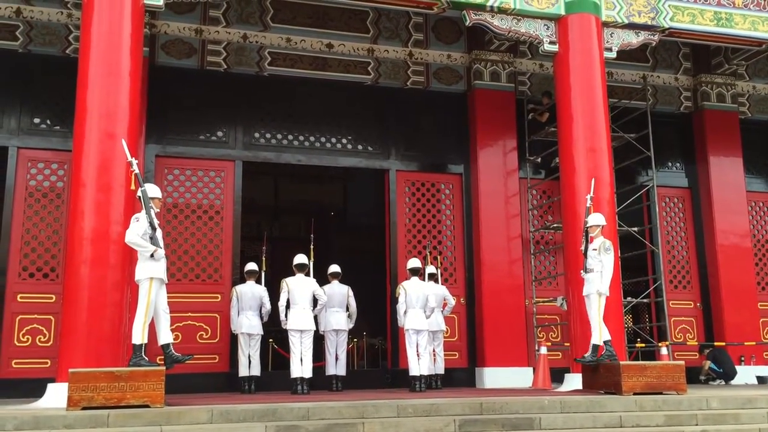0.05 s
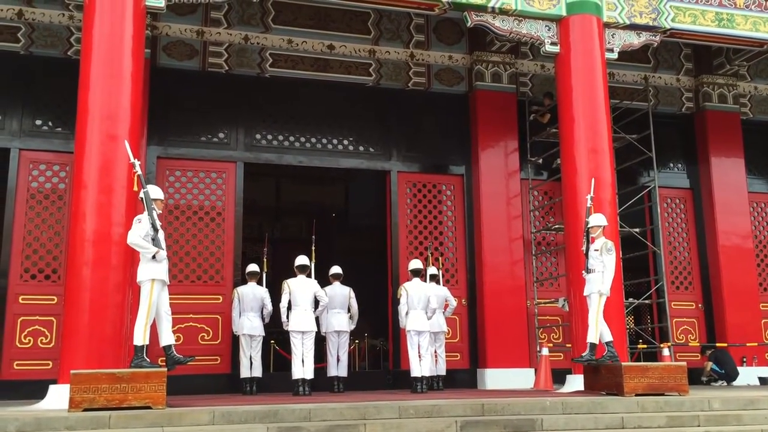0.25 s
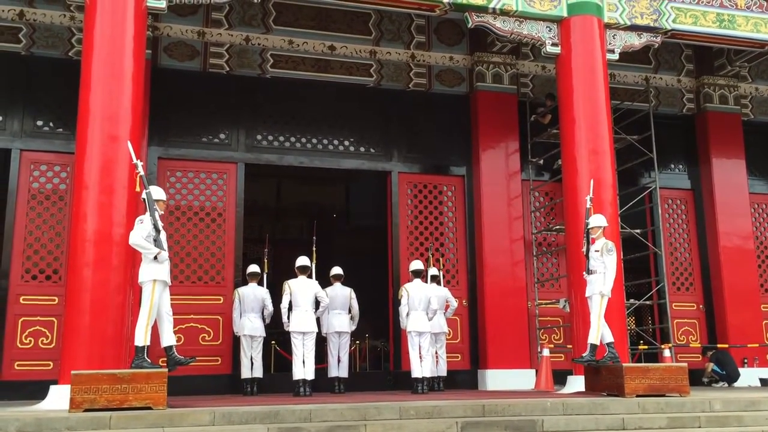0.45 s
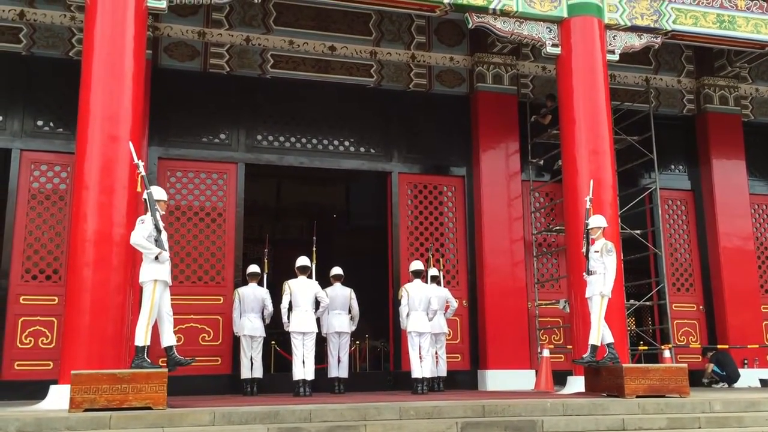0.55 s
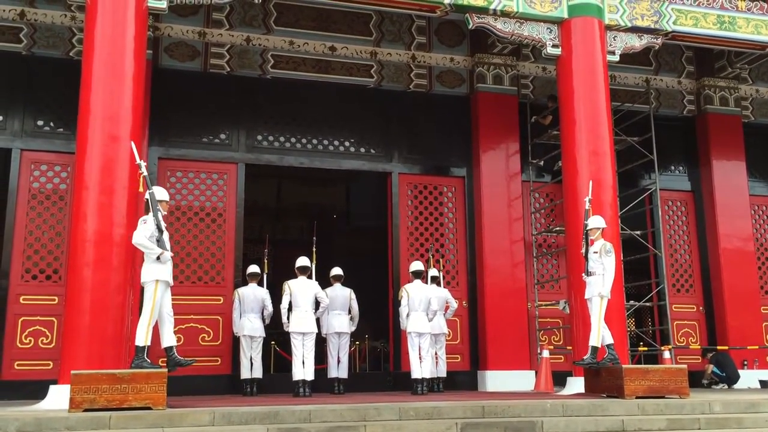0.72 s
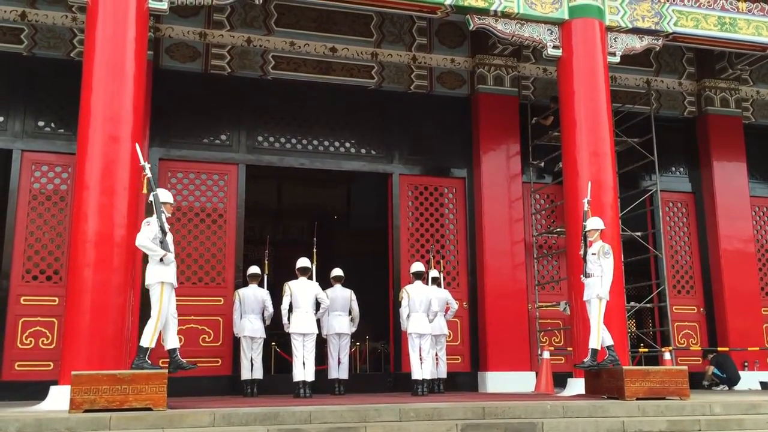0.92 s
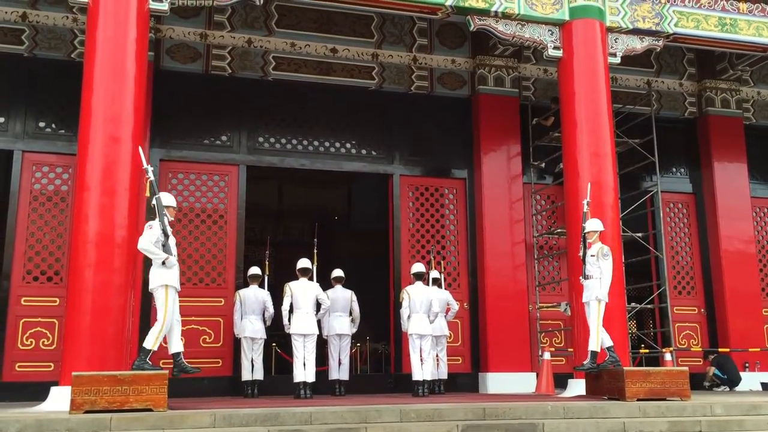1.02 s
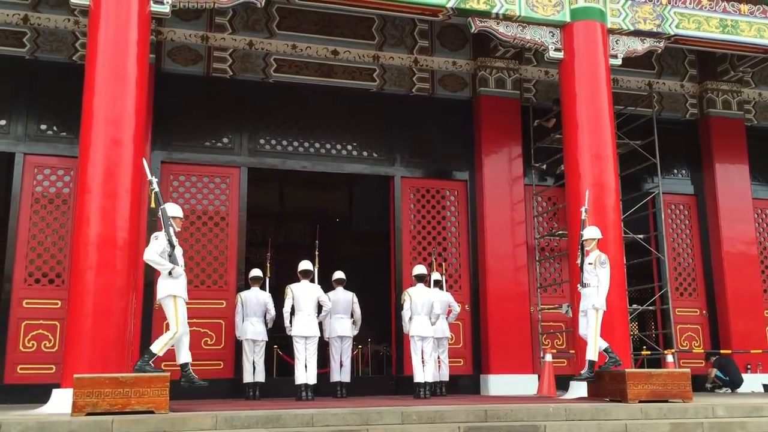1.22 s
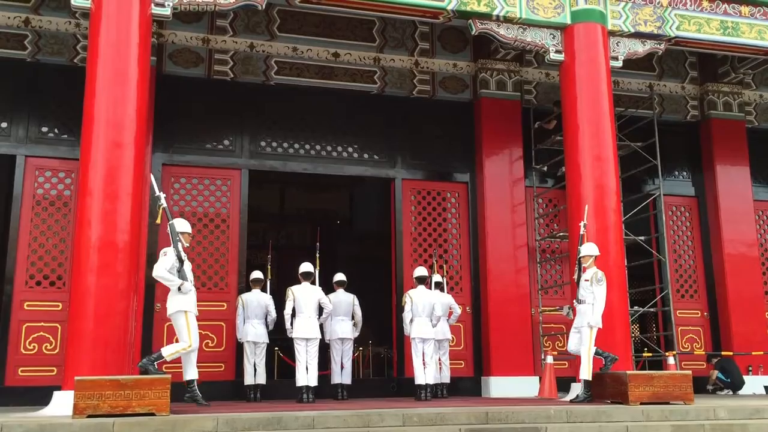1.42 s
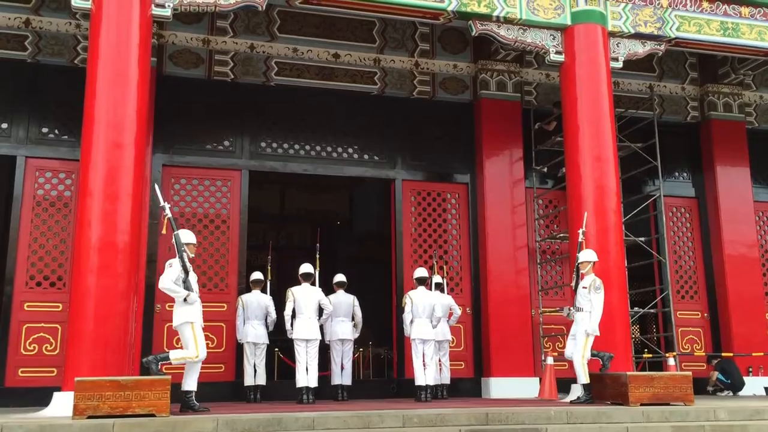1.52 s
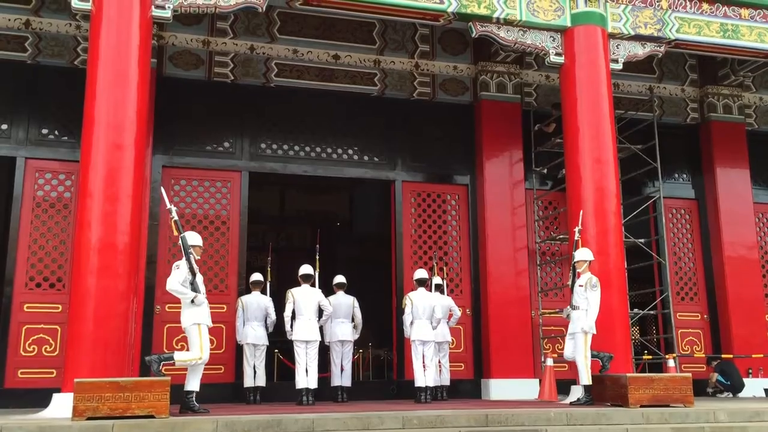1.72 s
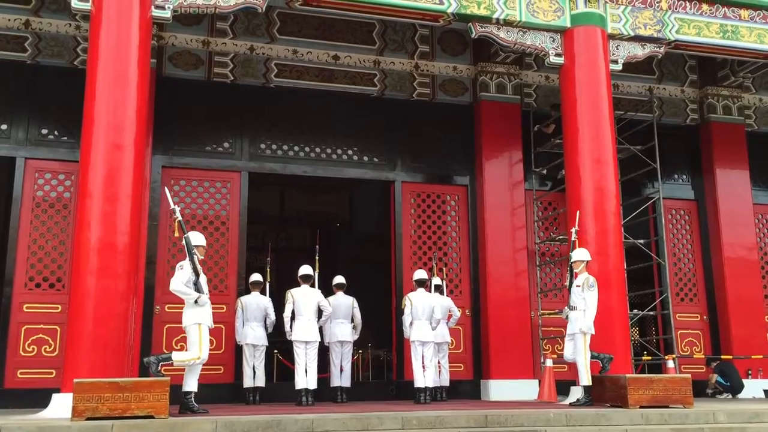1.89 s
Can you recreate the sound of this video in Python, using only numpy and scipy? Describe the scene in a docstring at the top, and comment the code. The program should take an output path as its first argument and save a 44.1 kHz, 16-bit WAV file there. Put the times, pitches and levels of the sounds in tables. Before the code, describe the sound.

One loud, sharp boot stamp on a wooden stand rings out in the porch of a large hall. As the echo fades there are tiny nearby ticks, then light metal clinks and gentle steps, with a town rumbling faintly far away.

```python
"""A distant town rumbles faintly; then a sharp crack as a guard stamps a steel-shod boot on a hollow
wooden stand in the porch of a large hall. Heel and sole ring the stand, the porch roof throws the
crack back and the hall rings on, with a few small dry ticks near by. Then the guards step down:
cloth rustles, a sole scuffs, rifle fittings clink and boots thud."""
import sys
import numpy as np
from scipy import signal
from scipy.fft import rfft, irfft
from scipy.io import wavfile

SR = 44100
rng = np.random.default_rng(int(sys.argv[2]) if len(sys.argv) > 2 else 0)


def dump(signal):
    """Clip the signal to [-1, 1] and save it as 16-bit WAV at the path in sys.argv[1]."""
    limited = np.clip(np.atleast_2d(signal).T, -1, 1)
    pcm = np.round(limited * 32767).astype(np.int16)
    wavfile.write(sys.argv[1], SR, pcm)


N = 85995


def undb(db):
    return 10 ** (np.asarray(db) / 20)


def clock():
    return np.arange(N) / SR


def fade(t60_s):
    return np.exp(-np.log(1000) * clock() / t60_s)


def by_pitch(hz, points, column=1):
    """Table column interpolated over log frequency."""
    points = np.array(points, float)
    return np.interp(np.log(np.maximum(hz, 1)), np.log(points[:, 0]), points[:, column])


def bin_gains(colour):
    return undb(by_pitch(np.fft.rfftfreq(N, 1 / SR), colour))


def noise(colour):
    """Coloured noise, rms 1."""
    x = irfft(rfft(rng.standard_normal(N)) * bin_gains(colour), N)
    return x / x.std()


def click(colour):
    """Coloured minimum-phase pulse."""
    cepstrum = irfft(np.log(bin_gains(colour)), N)
    causal_fold = 1 + np.sign(np.fft.fftfreq(N))
    return irfft(np.exp(rfft(cepstrum * causal_fold)), N)


def wander(rate_hz):
    """Random drift, spread near 1."""
    knots = rng.standard_normal(1024)
    return np.interp(clock() * rate_hz, np.arange(len(knots)), knots)


def ring(modes):
    """Damped sines of a struck object."""
    return sum(undb(db) * np.sin(2 * np.pi * hz * clock()) * fade(t60_s) for hz, db, t60_s in modes)


def at(start_s, x):
    return np.concatenate([np.zeros(int(start_s * SR)), x])[:N]


def high_pass(x, hz):
    return signal.sosfilt(signal.butter(2, hz, "high", fs=SR, output="sos"), x)


def bloom(delay_s, build_s, t60_s):
    """Unit-energy envelope of reflections: delay, build-up, decay."""
    envelope = np.clip((clock() - delay_s) / build_s, 0, 1) * fade(t60_s)
    return envelope / np.sqrt(np.sum(envelope ** 2))


# town spectrum: f/Hz, level/dB
TOWN_COLOUR = [(20, -14.5), (40, -10.5), (68, 3), (90, -1.5), (150, -6), (240, -8.5), (450, -16.5),
               (750, -19), (1300, -29), (2500, -37), (5000, -45), (10000, -50.5), (16000, -55)]


def town(level_db=-50.5, swell_db=0.9):
    """Far traffic rumbles, gently swelling."""
    return noise(TOWN_COLOUR) * undb(level_db + swell_db * wander(rate_hz=8.04))


# heel and sole contacts: t/s, push level/dB, crack level/dB
STAMP_CONTACTS = [(.2352, -2, -5.5), (.2378, 0, -19)]
# stand modes: f/Hz, level/dB, t60/s
STAND_MODES = [(125, -20.5, .08), (274.7, -18.5, 0.12), (341, -13, 0.037), (563, -17.5, 0.039),
               (709.5, -7, 0.038), (942, -23.5, 0.18), (1019.5, -6.5, 0.034), (1210, -17, 0.0093),
               (1315, -6, 0.008), (1640, -23, 0.012), (2070, -12, 0.023), (3070, -31, 0.011),
               (3940, -23, 0.01)]
# steel plate crack spectrum: f/Hz, level/dB
CRACK_COLOUR = [(150, -33.5), (600, -12.5), (1500, 22), (2500, 7), (4500, -3.5), (5800, 2), (8000, -22),
                (10500, -49), (13000, -39), (16000, -60)]
# spectrum of the slap into the porch: f/Hz, level/dB
SLAP_COLOUR = [(60, -15.5), (130, -3.5), (330, -3), (470, -4), (600, 5), (900, 6.5), (1100, 7), (1260, -1),
               (1420, 3.5), (1750, 2.5), (2120, 3), (2500, -5), (3000, -7.5), (3600, -16), (4700, -23),
               (6000, -24), (8000, -30), (11000, -37), (16000, -43)]


def stamp(stand_db=-0.5, push_s=0.00036, plate_db=-5, crack_t60_s=0.029,
          stand_send_db=-12.5, slap_send_db=26.5):
    """Each contact rings the hollow stand and cracks on the steel plate. Returns direct, room send."""
    struck = ring(STAND_MODES) * np.minimum(clock() / push_s, 1)
    stand = undb(stand_db) * high_pass(struck, hz=380)  # a small box radiates little bass
    pulse = click(SLAP_COLOUR)
    wood = crack = slap = 0
    for t, push_db, crack_db in STAMP_CONTACTS:
        wood += at(t, undb(push_db) * stand)
        crack += at(t, undb(plate_db + crack_db) * noise(CRACK_COLOUR) * fade(crack_t60_s))
        slap += at(t, undb(crack_db) * pulse)
    return wood + crack, undb(stand_send_db) * wood + undb(slap_send_db) * slap


# hall tail: f/Hz, level/dB, t60/s
HALL_TAIL = [(100, -7.5, 1.5), (292.5, 1, 2.04), (630, -1, 1.9), (1030, -3, 2.36), (1970, -3.5, 1.81),
             (2980, -0.5, 1.65), (5270, -1, 1.22), (9050, -8, 0.68), (15000, -2.5, .55)]


def room_response(near_db=-4.5, porch_db=-1, hall_db=-7):
    """Near scatter off floor and pillars, a burst off the porch roof, then the hall; treble dies first."""
    near = rng.standard_normal(N) * bloom(delay_s=.002, build_s=.003, t60_s=.22)
    porch = rng.standard_normal(N) * bloom(delay_s=.022, build_s=.02, t60_s=.38)
    hz = np.fft.rfftfreq(N, 1 / SR)
    white_spectrum = rfft(rng.standard_normal(N))
    edges_hz = np.geomspace(50, 17000, 25)
    hall = 0
    for low_hz, high_hz in zip(edges_hz, edges_hz[1:]):
        centre_hz = np.sqrt(low_hz * high_hz)
        band = irfft(white_spectrum * ((hz >= low_hz) & (hz < high_hz)), N)
        envelope = bloom(delay_s=.065, build_s=0.2, t60_s=by_pitch(centre_hz, HALL_TAIL, column=2))
        hall += band * envelope * undb(by_pitch(centre_hz, HALL_TAIL))
    return undb(near_db) * near + undb(porch_db) * porch + undb(hall_db) * hall


# dry ticks: t/s, level/dB, f/Hz
TICK_HITS = [(0.258, -33.5, 12500), (0.6702, -25.5, 3200), (0.8217, -41.5, 3000), (1.0097, -44, 2370),
             (1.1105, -43.5, 2660)]
# snap spectrum: f/Hz, level/dB
SNAP_COLOUR = [(1500, -9.5), (3000, 6), (6000, 5), (10000, -10.5), (16000, -10)]


def ticks(t60_s=0.0039, snap_db=-18.5):
    """Tiny hard contacts: a brief ring and a snap."""
    track = 0
    for t, db, hz in TICK_HITS:
        snap = undb(snap_db) * noise(SNAP_COLOUR) * fade(t60_s)
        track += at(t, undb(db) * (ring([(hz, 0, t60_s)]) + snap))
    return track


# rustle envelope: t/s, level/dB
RUSTLE_ENVELOPE = [(1.51, -81.5), (1.55, -79), (1.59, -69.5), (1.63, -68), (1.68, -67.5), (1.74, -64),
                   (1.8, -64.5), (1.851, -76), (1.95, -81)]
# spectrum of cloth and clink noise: f/Hz, level/dB
HISS_COLOUR = [(800, -31), (2200, 3.5), (4000, -3), (5200, -7.5), (8500, -7), (11000, -13), (16000, -12)]


def rustle(rough_db=2):
    """Uniform cloth rubs unevenly as the legs swing."""
    times_s, levels_db = np.array(RUSTLE_ENVELOPE).T
    envelope_db = np.interp(clock(), times_s, levels_db)
    cloth = noise(HISS_COLOUR) * (clock() > times_s[0])
    return cloth * undb(envelope_db - rough_db * wander(rate_hz=120))


# scuff spectrum: f/Hz, level/dB
SOLE_COLOUR = [(2800, -26.5), (4100, 9), (5000, 4), (5700, -3.5), (6800, -15), (8500, -7.5), (11000, -23.5)]


def scuff(centre_s=1.576, half_width_s=.027, level_db=-68, rough_db=2):
    """A sole slides grittily on the wood before the first step."""
    envelope = np.exp(-((clock() - centre_s) / half_width_s) ** 2)
    return noise(SOLE_COLOUR) * undb(level_db - rough_db * wander(rate_hz=120)) * envelope


# clinks: t/s, level/dB
CLINK_HITS = [(1.6075, -47.5), (1.6961, -51), (1.7084, -54), (1.7549, -45), (1.7574, -43.5),
              (1.7933, -53.5), (1.7957, -48), (1.8045, -58)]
# fitting modes: f/Hz, level/dB, t60/s
FITTING_MODES = [(2074, -4.5, 0.034), (3710, -6, .016), (3890, -4, 0.015), (5720, -9.5, 0.014),
                 (7580, -20, .018), (12700, -20, .016)]


def clinks(hiss_db=-4.5, hiss_t60_s=0.012):
    """Loose metal fittings knock as the rifles move."""
    metal = ring(FITTING_MODES)
    track = 0
    for t, db in CLINK_HITS:
        hiss = undb(hiss_db) * noise(HISS_COLOUR) * fade(hiss_t60_s)
        track += at(t, undb(db) * (metal + hiss))
    return track


# footfalls: t/s, level/dB
FOOTFALLS = [(1.6162, -31.5), (1.634, -43.5), (1.653, -34.5), (1.687, -40), (1.708, -38.5)]
# footfall modes: f/Hz, level/dB, t60/s
THUD_MODES = [(72, -25.5, .16), (146, -2, 0.039), (210, -9, 0.036), (393, -6, 0.029), (452, -8.5, 0.048),
              (637, -1.5, .025), (770, 0.5, 0.0079), (1270, -13, 0.013)]


def steps(push_s=0.0015):
    """Boots set down gently; a soft sole spreads the blow."""
    thud = ring(THUD_MODES) * np.minimum(clock() / push_s, 1)
    return sum(at(t, undb(db) * thud) for t, db in FOOTFALLS)


def scene(clink_send_db=-11, step_send_db=2.5):
    """Mono mix; only stamp, clinks and steps excite the room."""
    response = room_response()
    blow, stamp_send = stamp()
    metal, feet = clinks(), steps()
    send = stamp_send + undb(clink_send_db) * metal + undb(step_send_db) * feet
    echo = signal.fftconvolve(send, response)[:N]
    return (blow + metal + feet + echo + ticks() + scuff() + rustle() + town())[None]


def record(dry, low_hz=54.3, ceiling=.73, top_hz=15800):
    """Microphone: bass cut, soft peak limit, top cut."""
    thinned = high_pass(dry, low_hz)
    limited = thinned / (1 + (thinned / ceiling) ** 6) ** (1 / 6)
    return signal.sosfilt(signal.ellip(10, .1, 80, top_hz, fs=SR, output="sos"), limited)


dry = scene()
out = record(dry)
dump(out)
```